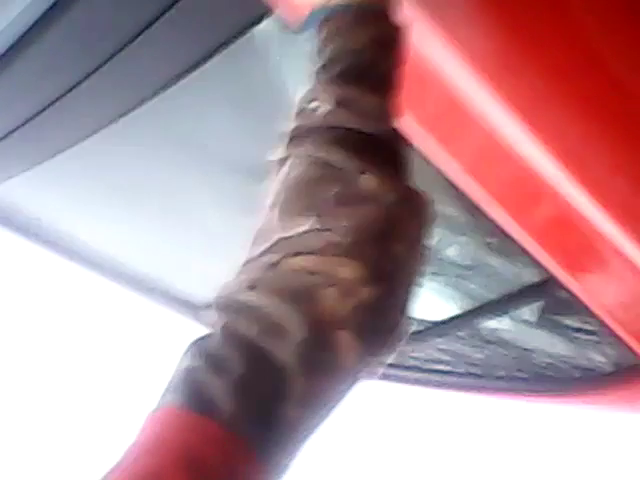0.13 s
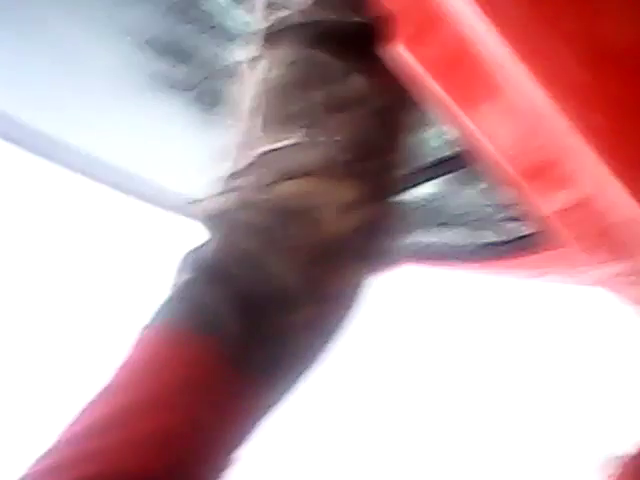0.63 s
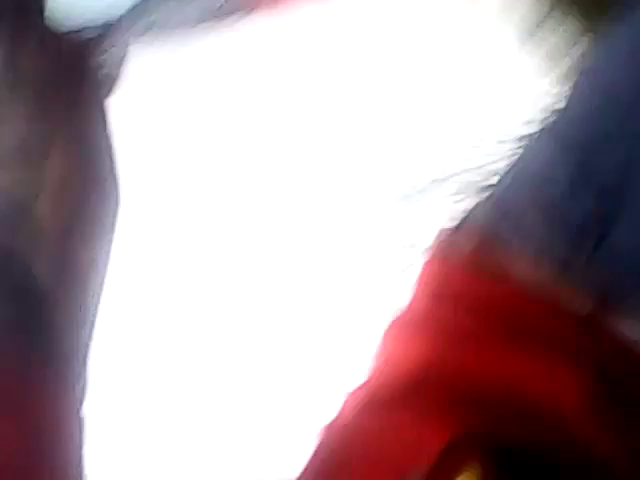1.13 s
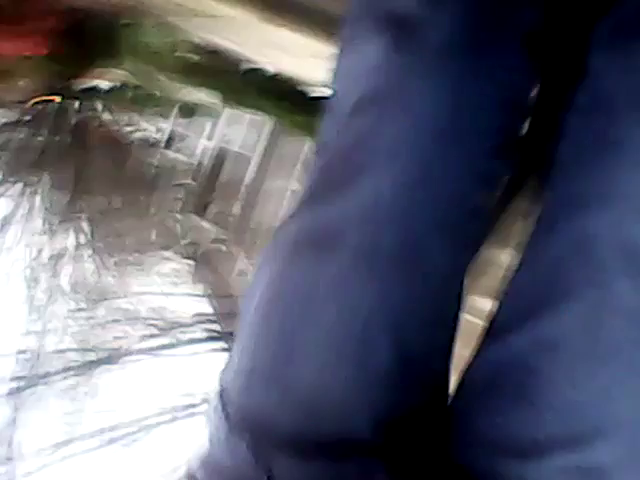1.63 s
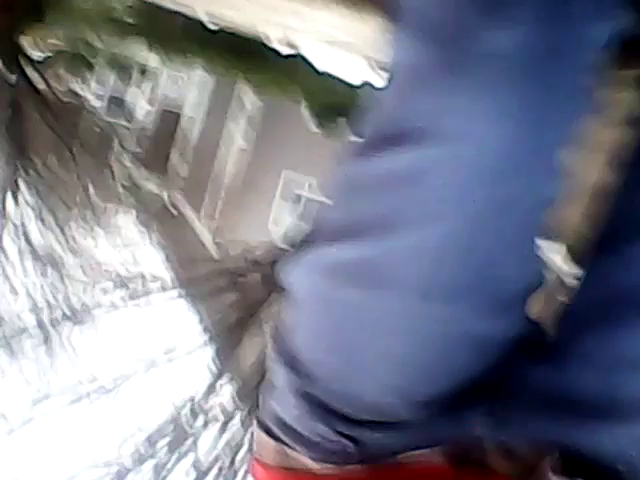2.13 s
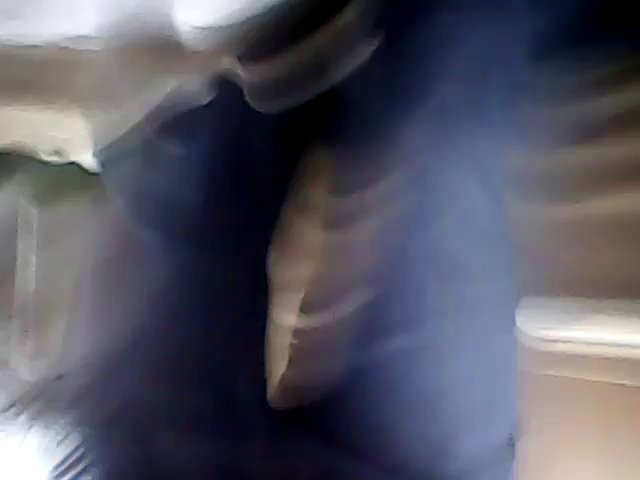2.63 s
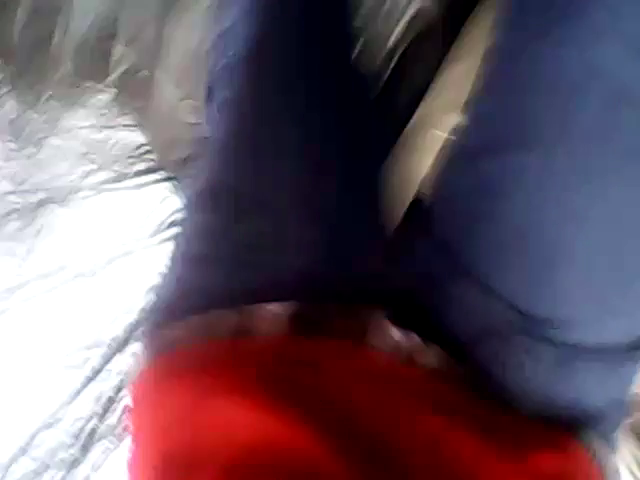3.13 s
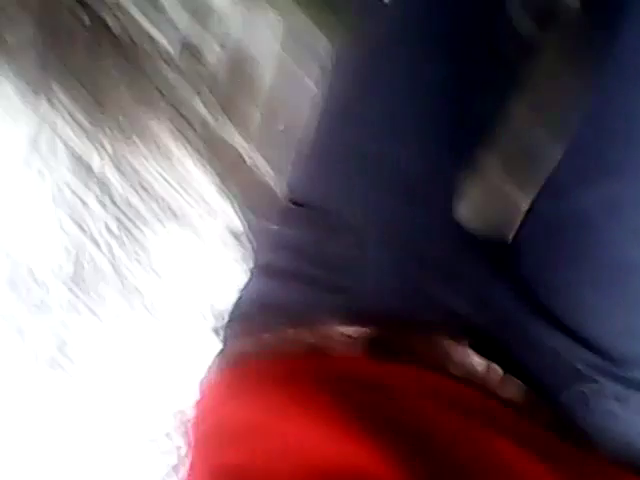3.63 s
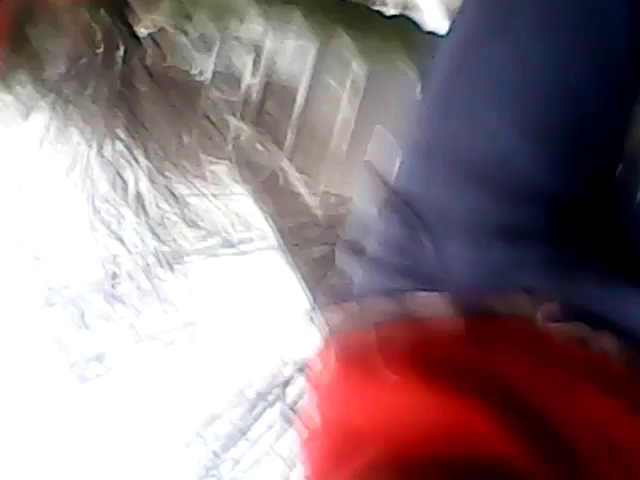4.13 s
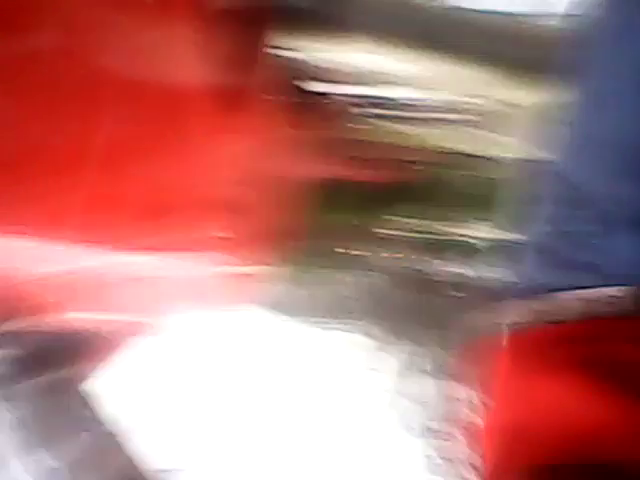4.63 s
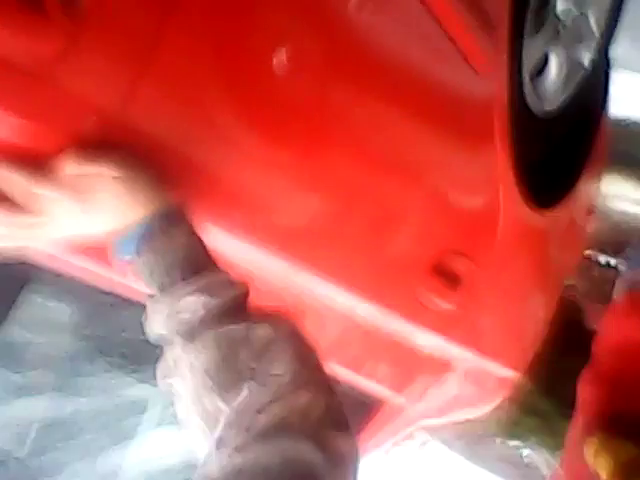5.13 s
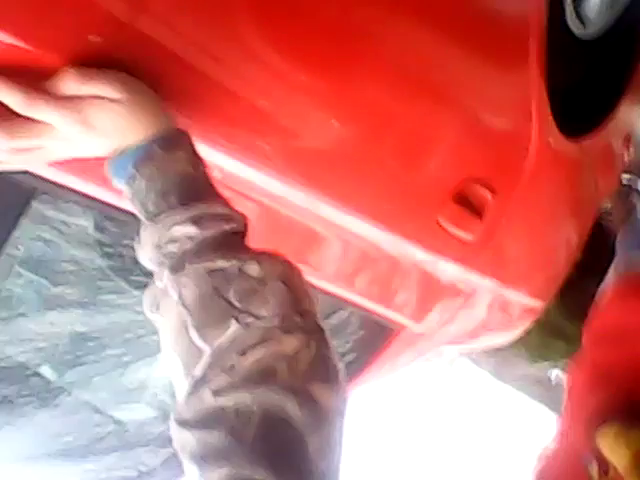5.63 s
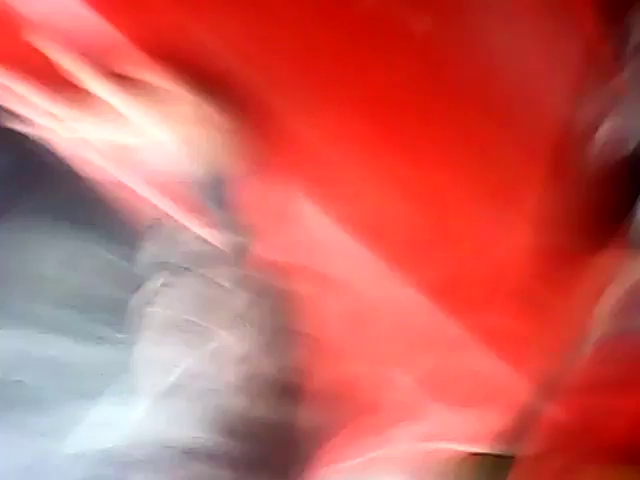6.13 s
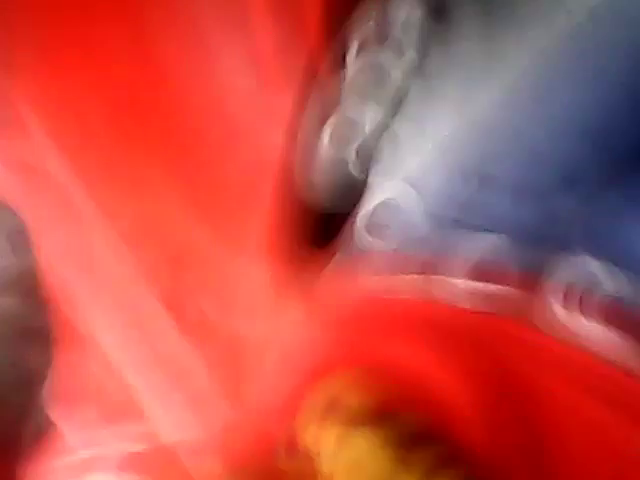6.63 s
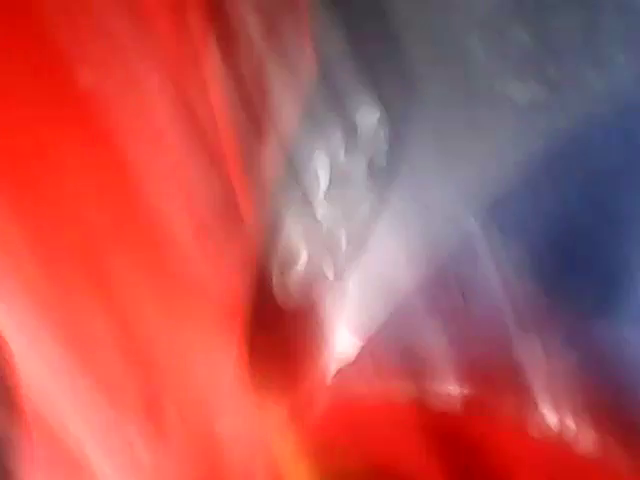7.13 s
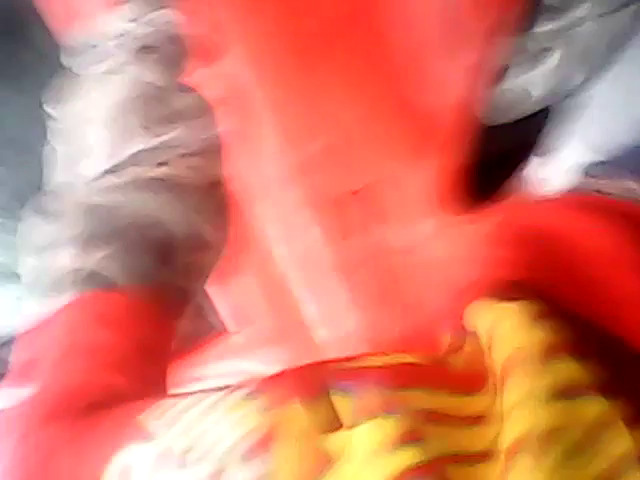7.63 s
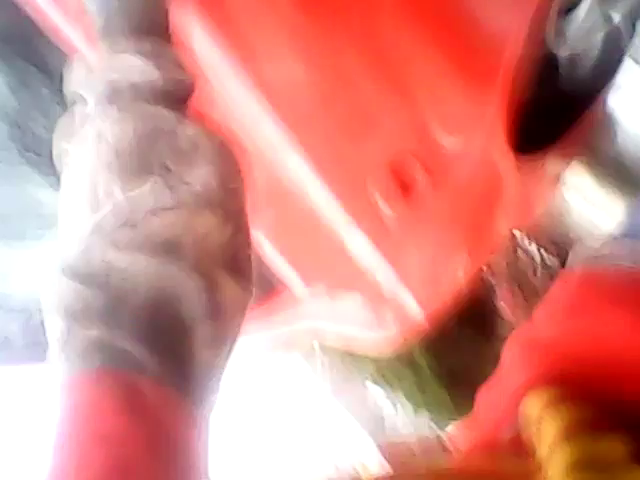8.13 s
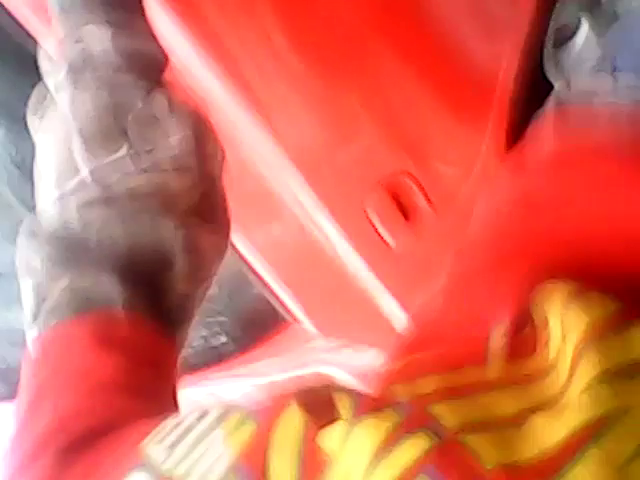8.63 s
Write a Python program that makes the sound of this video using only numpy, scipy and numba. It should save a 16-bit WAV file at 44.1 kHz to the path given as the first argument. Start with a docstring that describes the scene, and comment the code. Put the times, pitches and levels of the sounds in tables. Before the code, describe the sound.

Ice is scraped off a car outdoors: a few crunches, one long rasping drag, then hard crushing strokes with sharp snaps and sliding chips.

```python
"""A few crunches, one long scrape, then hard crunching strokes with snaps and sliding chips between,
and a short last scrape: ice is worked off a car outdoors, close to a small microphone that overloads.
Each stroke crushes many ice grains that ring the ice sheet and hiss: random clicks through resonances.
Single plates snap with a bright tick and a duller ring, both made of short bursts of filtered noise.
Drags and chips are uneven bunches of grains; a low rumble and a faint distant traffic hum lie below."""
import sys
import numpy as np
from scipy import signal
from scipy.fft import rfft, irfft, next_fast_len
from scipy.io import wavfile
from scipy.ndimage import uniform_filter1d
from numba import njit

SR = 44100
rng = np.random.default_rng(int(sys.argv[2]) if len(sys.argv) > 2 else 0)


def waveform_to_disk(signal):
    """Save audio, clipped to [-1, 1], as 16-bit WAV at the path in sys.argv[1]."""
    frames = np.transpose(np.atleast_2d(signal))
    scaled = np.clip(frames, -1, 1) * 32767
    samples = np.round(scaled).astype(np.int16)
    wavfile.write(sys.argv[1], SR, samples)


N = 390285
TIME = np.arange(N) / SR  # seconds

# spectrum of the fine hiss of crushed ice: pitch_hz [Hz], level_db [dB per Hz, relative]
GRIT_SPECTRUM = [(1180, -40.5), (2000, -14), (2330, -2.5), (4690, -8.5), (5000, -7), (6540, -8.5),
                 (7630, -13), (11800, -14.5), (13900, -20.5)]


def undb(db):
    """Turn decibels into a plain amplitude factor."""
    return 10 ** (np.asarray(db) / 20)


def unit(x):
    """Scale a signal to an average (rms) level of 1."""
    return x / np.sqrt(np.mean(x ** 2))


@njit
def svf(x, hz, sharp):
    """State-variable band-pass with a moving centre; sharp = centre over width."""
    y = np.empty(len(x))
    band, low, damping = 0., 0., 1 / sharp
    for i in range(len(x)):
        g = np.tan(np.pi * hz[i] / SR)
        v = (band + g * (x[i] - low)) / (1 + g * (g + damping))
        band = 2 * v - band
        low = low + 2 * g * v
        y[i] = damping * v
    return y


def steep(x, hz, sharp):
    """A resonance applied twice, so that it is dark on both sides of its pitch."""
    return unit(svf(svf(x, hz, sharp), hz, sharp))


def colour(x, table):
    """Shape a sound to a spectrum given as (Hz, dB) points."""
    hz, db = np.transpose(table)
    size = next_fast_len(N)
    f = np.maximum(np.arange(size // 2 + 1) * SR / size, 1)
    gain_db = np.interp(np.log(f), np.log(hz), db, -80, db[-1])
    return unit(irfft(rfft(x, size) * undb(gain_db), size)[:N])


def walk(rate):
    """A random wandering curve: new values rate times a second, smoothed twice; rms 1."""
    k = int(SR / rate)
    steps = np.repeat(rng.standard_normal(N // k + 1), k)
    return unit(uniform_filter1d(uniform_filter1d(steps, k), k)[:N])


def grains(rate, spread_db):
    """Ice grains breaking at random moments, rate a second, some larger than the rest."""
    breaks = rng.random(N) < rate / SR
    clicks = breaks * rng.standard_normal(N)
    return unit(clicks * undb(spread_db * np.minimum(rng.exponential(size=N), 3.5)))


def shards(hz, wander_db, rate):
    """Splinters ringing for a few cycles, at pitches scattered around hz."""
    hop = SR // 120  # a new pitch 120 times a second
    pitch = np.repeat(rng.standard_normal(N // hop + 1), hop)[:N]
    # the pitch scatter is also counted in dB: 6 dB is one octave
    return steep(grains(rate, 2.0), np.clip(hz * undb(wander_db * pitch), 200, 12000), 4)


def held(starts, values):
    """Each event's value, kept until the next event."""
    return values[np.maximum(np.searchsorted(starts, TIME) - 1, 0)]


def add(track, start, gain, rise, hold, t60, size, power=2):
    """Add one envelope: smooth rise, hold, then a decay that falls 60 dB in t60 seconds."""
    i = int(start * SR)
    t = TIME[:min(size, N - i)]
    rise = max(rise, 1 / SR)
    swell = np.sin(np.pi / 2 * np.minimum(t / rise, 1)) ** power
    decay_time = np.maximum(t - rise - max(hold, 0), 0)
    track[i:i + len(t)] += gain * swell * undb(-60 * decay_time / max(t60, 1 / 1000))


def spans(tables):
    """Columns of several curve tables over time, and a gate that is open inside them."""
    s, *columns = np.concatenate(tables).T
    inside = sum((TIME >= table[0][0]) & (TIME <= table[-1][0]) for table in tables) > 0
    gate = uniform_filter1d(1. * inside, size=SR // 50)
    return gate, [np.interp(TIME, s, column) for column in columns]


def traffic():
    """Distant roads: noise shaped to a smooth hum that swells a little, under a faint even hiss."""
    # spectra of the hum and the hiss: pitch_hz [Hz], level_db [dB per Hz, relative]
    hum_spectrum = [(15, -31.5), (25, -3.5), (80, 0.5), (155, -0.5), (178, -13.5), (282, -10.5), (366, -8),
                    (438, -12.5), (1120, -9.5), (1970, -24.5), (3000, -27.5), (3900, -59), (6600, -120)]
    hiss_spectrum = [(1200, -20), (2000, -0.5), (5000, -6), (13500, -7)]
    # the added last point sets the level of everything above 6 kHz
    hum = colour(rng.standard_normal(N), [*hum_spectrum, (6000, -58)])
    hum = undb(-64 + 1.2 * walk(0.99)) * hum
    hiss = colour(rng.standard_normal(N), hiss_spectrum)
    return hum + undb(-74.5 + .7 * walk(43)) * hiss


def rumble(work):
    """A low rumble under the ice sounds: noise rising and falling with their level, less than in proportion."""
    # spectrum of the rumble: pitch_hz [Hz], level_db [dB per Hz, relative]
    rumble_spectrum = [(25, -8.5), (60, 8), (120, 4.5), (200, -1), (350, -11), (700, -73)]
    keep = np.exp(-1 / (0.019 * SR))  # the level is averaged over about 19 ms
    level = np.sqrt(signal.lfilter([1 - keep], [1, -keep], work ** 2) + 1e-12)
    return undb(-28.5) * level ** 0.53 * colour(rng.standard_normal(N), rumble_spectrum)


def squeak():
    """One faint, short, wavering squeak: noise through a narrow resonance."""
    # the one squeak: start_s [s], peak_db [dB, nominal], pitch_hz [Hz], hold_s [s]
    squeak_row = (8.1, -47, 1090, .03)
    s, db, hz, hold = squeak_row
    level = np.zeros(N)
    add(level, s, undb(db), .008, hold, .04, size=SR // 5)
    return level * steep(rng.standard_normal(N), np.full(N, 1. * hz), 6.0)


def chips():
    """Loose chips slide and crumble: sparser crumbs in bunches, each patch of ice with its own pitch."""
    # slides: start_s [s], swell_s [s], hold_s [s], dull_db [dB], bright_db [dB relative to dull]
    slide_table = [(0.0, 0.0011, 0, -28, -0.5), (0.4, 0.0084, 0, -43, -19.5), (2.082, 0.031, .06, -47, -10),
                   (2.73, .01, 0.021, -31.5, -4.5), (2.887, 0.091, 0.087, -36.5, -7),
                   (3.04, .07, 0.1, -34.5, -5), (3.33, 0.054, 0, -23.5, -10),
                   (3.867, 0.094, 0.096, -28.5, -5), (4.02, 0.024, 0.15, -42, -3.5),
                   (4.42, 0.044, 0.067, -26, -1.5), (4.56, .03, 0.17, -51, 4),
                   (4.768, 0.0093, 0.01, -39, -9.5), (4.894, 0.11, 0, -39, 0),
                   (5.296, 0.021, 0.053, -36.5, -7), (5.59, .01, 0.077, -59, -9),
                   (6.034, .01, 0.025, -45.5, -4.5), (6.129, 0.031, 0.11, -42, -3.5),
                   (6.358, 0.13, 0.082, -44.5, -14.5), (6.658, 0.031, 0.032, -36, -5),
                   (6.857, 0.052, 0.004, -54, -1.5), (7.044, .1, 0.058, -56.5, -8.5),
                   (7.208, .03, 0.024, -57, -10), (7.879, 0.024, 0.06, -47, -8)]
    t60_s = 0.35
    low, high = np.zeros((2, N))
    for s, swell, hold, db, bright_db in slide_table:
        add(low, s, undb(db), swell, hold, t60_s, size=SR)
        add(high, s, undb(db + bright_db), swell, hold, t60_s, size=SR)
    bunch = undb(3.2 * walk(60))
    dull = steep(grains(4500, 3.2) * bunch, 1000 * undb(2.6 * walk(21)), 0.81)
    dull = dull + undb(-9.0) * unit(bunch * shards(800, 3.6, 1500))
    bright = colour(grains(4600, 2.0) * bunch, GRIT_SPECTRUM)
    bright = bright + undb(-7.5) * unit(bunch * shards(3300, 5.3, 600))
    return low * unit(dull) + high * unit(bright)


def drag():
    """Stick-slip of the edge over rough ice: bunched grains; ring, rasp and grit surge partly on their own."""
    # curves, one list a drag: start_s [s], ring_db [dB], ring_hz [Hz], bright_db [dB relative to ring]
    drag_tables = [
        [(0.68, -29, 950, -6.5), (0.782, -17.5, 974, -7), (0.914, -20.5, 836, -11.5), (0.954, -32.5, 900, 1.5),
         (0.982, -19.5, 1020, -15.5), (1.026, -22.5, 910, -3), (1.07, -16.5, 960, -16), (1.11, -26, 970, -3),
         (1.36, -31, 875, -5), (1.396, -32, 762, 2), (1.408, -24, 760, -8.5), (1.634, -27, 790, 1.5),
         (1.79, -24, 706, -3), (1.846, -27, 990, -6), (1.914, -26, 670, -5.5), (2.002, -21.5, 1050, -6),
         (2.074, -29.5, 780, -7.5), (2.11, -55, 727, -6)],
        [(8.66, -37, 920, -11), (8.688, -46, 970, -2), (8.712, -30.5, 1060, -3.5), (8.85, -32.5, 929, 1)],
    ]
    gate, (ring_db, ring_hz, bright_db) = spans(drag_tables)
    # the brightness is shared between a coarse rasp and a fine grit
    rasp_db = ring_db + bright_db - 3.5
    grit_db = ring_db + bright_db - 7.5
    bunch = undb(.8 * walk(50))
    slip = undb(1.4 * walk(100))

    core = steep(grains(6000, 1.6) * bunch * slip, ring_hz * (1 + .04 * walk(15)), 2.2)
    broad = steep(grains(6000, 2.3) * bunch * slip, ring_hz, 0.45)
    ring = unit(core + broad)

    rasp_grains = grains(6000, 0.53) * bunch * undb(2.2 * walk(66))
    rasp = steep(rasp_grains, 2300 * (1 + 0.12 * walk(20)), 0.8)
    rasp = unit(rasp + undb(-8) * bunch * shards(2610, 2.65, 2900))

    grit_grains = grains(8000, 1.6) * bunch * undb(1.76 * walk(60))
    grit = colour(grit_grains, [(2500, -16.0), (4200, -5.0), (5200, -4),
                                (6200, -1.5), (8000, -1.5), (13500, -5)])
    # the blade sings near 6 kHz where the drag is bright against its ring
    sing_db = np.clip(grit_db - ring_db, -20, -4) + 2.0
    grit = grit + steep(grains(8000, 1.4), np.full(N, 6200.), 4.0) * undb(sing_db)
    return gate * (undb(ring_db) * ring + undb(rasp_db) * rasp + undb(grit_db) * grit)


def crumble():
    """A crust crumbling in small chance snaps close together: rows like those of the snap table."""
    begin_s, end_s, count = 2.99, 3.27, 20
    when, size, tick, ring, pitch = rng.random((count, 5)).T
    s = begin_s + (end_s - begin_s) * (np.arange(count) + when) / count
    tick_db = -28 + 3 * (2 * size - 1)
    ring_db = -9 + 7.2 * (2 * ring - 1)
    # both pitches spread over one octave
    return np.transpose([s, tick_db, 2900 * 2 ** tick, ring_db, 900 * 2 ** pitch])


def snaps():
    """Ice plates break: a very short bright tick, then the freed plate rings duller and longer."""
    # single snaps, before the level trims below:
    # start_s [s], tick_db [dB], tick_hz [Hz], ring_db [dB relative to tick], ring_hz [Hz]
    snap_table = [(0.3175, -2, 2982, -16.5, 1270), (2.4966, -57, 2480, 6, 921),
                  (2.5687, -60.5, 3876, -21, 1210), (2.6584, -67, 2039, 12.5, 1110),
                  (2.7525, -10, 3203, -20, 641), (2.9143, -25, 2590, -15, 1274),
                  (2.9327, -3, 2108, -15.5, 1320), (2.9482, -9, 2118, -4.5, 1327),
                  (2.9596, -19.5, 2015, 1, 1288), (2.9745, -5, 1993, -12, 1350),
                  (2.9916, -20.5, 2255, 3.5, 1509), (3.0386, -21.5, 4230, -2, 1360),
                  (3.1164, -16.5, 3560, -13.5, 584), (3.1812, -25.5, 3500, 0, 1956),
                  (3.2179, -27, 3027, -5, 920), (3.3049, -3.5, 2081, -6, 417),
                  (3.6425, -39.5, 3430, -24, 754), (3.9207, -24.5, 2655, -7, 853),
                  (4.0002, 13, 3020, -12, 1420), (4.0143, -8.5, 3290, -9.5, 837),
                  (4.0558, -2, 2970, -25, 1280), (4.0598, -3, 2175, -12, 1450),
                  (4.0736, 6, 2140, -16, 1390), (4.081, 9, 2117, -27, 1340), (4.0862, 0.5, 1989, -29, 1930),
                  (4.0964, -8, 2998, -3.5, 439), (4.1044, 3, 6420, -14, 1320),
                  (4.1122, 12.5, 4280, -15.5, 401), (4.1385, -23.5, 5377, -25.5, 1620),
                  (4.151, -1.5, 2078, -22.5, 1340), (4.156, -2, 5813, -12.5, 401),
                  (4.1654, -20, 2507, 0.5, 1500), (4.1744, -9.5, 3984, -13.5, 425),
                  (4.1845, -11.5, 3076, -19.5, 748), (4.2072, -24.5, 2598, -24, 1060),
                  (4.353, -2.5, 2953, -45, 826), (4.4367, -3.5, 3022, -17, 420),
                  (4.4462, -14.5, 5060, -2.5, 476), (4.4559, 5.5, 2633, -25, 1060),
                  (4.4658, -9.5, 3890, -11.5, 883), (4.4776, 3, 5260, -17, 1340),
                  (4.4833, 4.5, 2463, -14.5, 622), (4.4908, 8.5, 2696, -37, 1350),
                  (4.496, -3.5, 4040, -18, 1610), (4.5022, -10.5, 2590, -11, 1170),
                  (4.5087, -1, 5820, -11, 519), (4.5178, 1, 1943, -20, 1220), (4.5239, -5, 2535, -14, 1360),
                  (4.5418, -10, 2088, -10, 1300), (4.601, -8.5, 4490, -31.5, 1130),
                  (4.6404, -15.5, 3938, -16, 782), (5.7936, -47, 4290, -31, 1130),
                  (5.8908, -48, 3376, -12, 1630), (6.208, -25, 4010, -17, 902),
                  (6.2331, -35, 3650, -3, 774), (6.2502, -30, 2473, 3.5, 929),
                  (6.3639, -27.5, 2677, -7, 563), (6.4001, -40, 3200, -6, 695),
                  (6.4207, -23, 3260, -7, 676), (6.4264, -8.5, 3168, -49, 1280),
                  (6.4475, -32, 2570, 7.5, 917), (6.4604, -36, 2982, 14.5, 516),
                  (6.4717, -33.5, 1996, 12.5, 595), (6.4953, -5, 5390, -22.5, 1520),
                  (6.5491, -41, 1982, 10.5, 750), (6.563, -30.5, 2297, 5, 409),
                  (6.6255, -17, 1978, -2, 670), (6.803, -33, 2254, -4.5, 560),
                  (7.012, -45, 2316, -1.5, 565), (7.0969, -59.5, 2357, 10.5, 563),
                  (7.128, -57, 2398, 11, 501), (7.1492, -38, 2392, -17, 1110),
                  (7.1746, -43.5, 2432, 2, 904), (7.199, -36, 2332, 1, 549), (7.3206, -51, 2730, 8, 549),
                  (7.3744, -60.5, 2364, 16, 641), (8.1861, -53.5, 2540, -9.5, 1180),
                  (8.3805, -51.5, 3740, -12, 1070)]
    t60_s = .011  # of the tick
    tick, ring = np.zeros((2, N))
    table = np.concatenate([snap_table, crumble()])
    table = table[np.argsort(table[:, 0])]
    for s, db, _, ring_db, _ in table:
        add(tick, s, undb(db - 8.5), .0003, .0006, t60_s, size=SR // 10)
        add(ring, s + 0.00029, undb(db + ring_db + 4.5), .0006, .001, 1.6 * t60_s, size=SR // 10)
    start = table[:, 0] - 1 / 1000  # the pitch changes 1 ms ahead of the snap
    noise = rng.standard_normal((2, N))
    bright = steep(noise[0], held(start, table[:, 2]), 0.31)
    sparkle = colour(noise[1][::-1], [(1500, -21.0), (3000, 2), (14000, -16.5)])
    plate = steep(noise[1], held(start, table[:, 4]), 0.74)
    return tick * unit(bright + undb(-3.5) * sparkle) + ring * plate


def strokes():
    """Bursts of dense grains ring the ice sheet at a pitch of their own; the thud outlasts the grit."""
    # short crushing strokes: start_s [s], ring_db [dB, nominal peak], ring_hz [Hz],
    # grit_db [dB relative to ring], thud_db [dB relative to ring], rise_s [s], t60_s [s, of the ring]
    stroke_table = [(0.049, -25.5, 1151, 0.5, -9, .008, 0.043), (0.252, -6, 1076, -1, -13.5, 0.042, .24),
                    (0.317, -9.5, 1228, -0.5, -29.5, 0.018, 0.054),
                    (0.365, -14, 1129, 4, -13.5, .018, 0.041), (0.622, -4, 1029, -3.5, -22.5, 0.037, 0.046),
                    (2.118, -30, 1140, -10.5, -9.5, 0.011, 0.15),
                    (2.685, -4, 835, -9.5, -15.5, 0.023, 0.066),
                    (3.295, -3.5, 1416, -5.5, 0.5, 0.0089, 0.11),
                    (3.364, -24.5, 1401, 0.5, -34.5, 0.028, .13),
                    (3.45, -22, 1338, -2.5, -7.5, 0.018, 0.16), (3.801, -3.5, 1063, -3.5, -10, 0.023, 0.13),
                    (3.932, -10, 639, -4, -31, 0.014, 0.18), (4.258, -2.5, 946, -2, -17, 0.013, 0.12),
                    (4.359, -24.5, 874, 0.5, -41.5, 0.017, 0.16),
                    (4.728, -4.5, 959, -2, -5.5, 0.0079, 0.087),
                    (4.863, -31.5, 940, -2.5, -13, 0.0041, 0.25), (4.915, -29.5, 1131, -1, -4, .012, 0.26),
                    (5.094, -37.5, 1115, -2.5, -13, 0.016, 0.074),
                    (5.253, -6, 923, -4.5, -15.5, 0.026, 0.14), (5.384, -29.5, 899, 0, -8, 0.0064, 0.19),
                    (5.533, -13, 861, -9.5, -15.5, 0.013, 0.15),
                    (5.616, -52.5, 1167, 11, 0.5, 0.0091, 0.092),
                    (5.969, -7.5, 1142, -6.5, -9.5, 0.019, 0.093), (6.152, -33.5, 899, -1, 1, 0.018, 0.19),
                    (6.577, -9.5, 1556, 0, 2, 0.012, 0.11), (6.672, -25.5, 634.7, -15, -32, 0.011, 0.37),
                    (6.9, -43, 1084, -1, -18, 0.018, 0.13), (7.794, -3.5, 1320, -5, -12, 0.037, 0.19),
                    (8.085, -51.5, 1594, 4, -7.5, 0.027, 0.18),
                    (8.598, -11.5, 1356, 0.5, -3.5, 0.028, 0.086)]
    crest_db = 9  # peak over rms of crushed ice
    shape = dict(size=SR // 2, power=1.8)  # a power below 2 makes the edge bite sooner
    hold_s = 0.0088
    ring, grit, thud = np.zeros((3, N))
    for s, db, _, grit_db, thud_db, rise, t60 in stroke_table:
        level_db = db - crest_db
        add(ring, s, undb(level_db), rise, hold_s, t60, **shape)
        add(grit, s, undb(level_db + grit_db), rise, hold_s, 1.034 * t60, **shape)
        add(thud, s, undb(level_db + thud_db), rise, hold_s, 1.3 * t60, **shape)
    table = np.array(stroke_table)
    hz = held(table[:, 0], table[:, 2])
    bunch = undb(1.7 * walk(150))
    sheet = steep(grains(8000, 4.2) * bunch, hz, 0.87)
    sheet = unit(sheet + undb(-5.5) * shards(hz, 2.5, 3000))
    fine = colour(grains(9000, 1.3) * bunch, GRIT_SPECTRUM)
    fine = unit(fine + undb(-3.0) * shards(3000, 2.6, 3000))
    door = steep(grains(4000, 1.0) * bunch, np.full(N, 380.), 1.3)  # the sheet metal answers low
    jolt = steep(rng.standard_normal(N), np.full(N, 120.), 0.31)
    return ring * (sheet + undb(-17.5) * jolt) + grit * fine + thud * door


def scene():
    """Mix the ice work with its short echoes, a low rumble and the distant traffic."""
    near = strokes() + snaps() + drag() + chips() + squeak()
    # ground and bodywork throw back a short scatter of echoes
    t = TIME[:SR // 4]
    scatter = rng.standard_normal(len(t)) * undb(-60 * t / 0.054) * (t > .003)
    echoes = signal.fftconvolve(near, scatter / np.sqrt(np.sum(scatter ** 2)))[:N]
    return (near + undb(-17.0) * echoes + rumble(near) + traffic())[None]


def record(dry):
    """The microphone's input stage clips the loudest peaks, then the treble above 14 kHz is cut."""
    clipped = np.clip(dry, -.97, .97)
    low_pass = signal.ellip(8, .2, 60, 14000, fs=SR, output="sos")
    return signal.sosfilt(low_pass, clipped)


dry = scene()
out = record(dry)
waveform_to_disk(out)
```